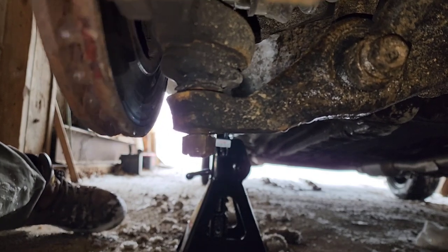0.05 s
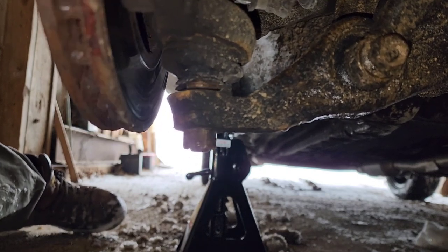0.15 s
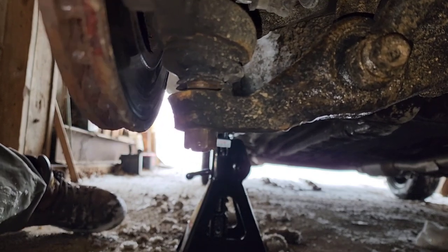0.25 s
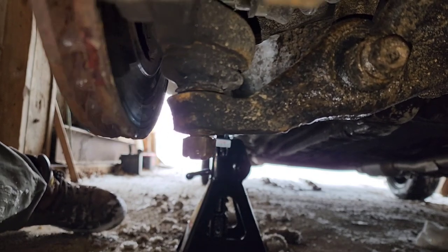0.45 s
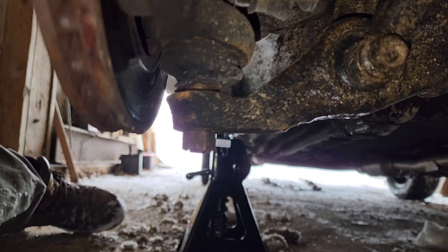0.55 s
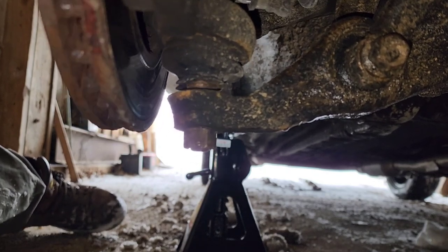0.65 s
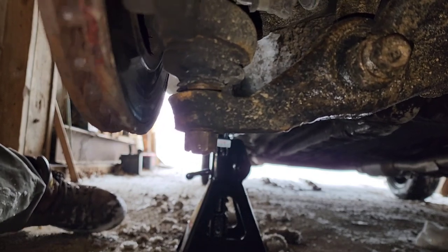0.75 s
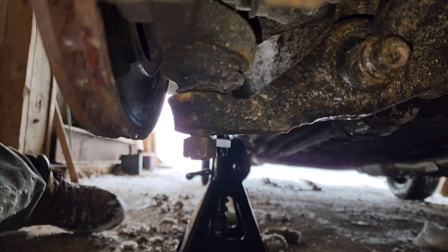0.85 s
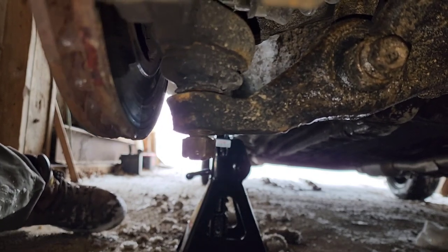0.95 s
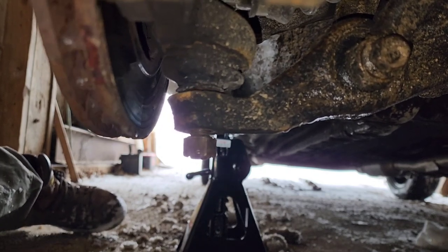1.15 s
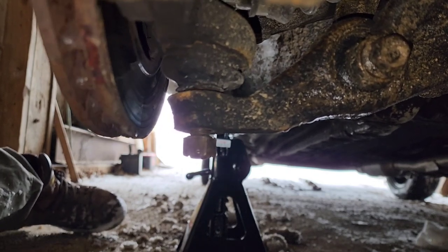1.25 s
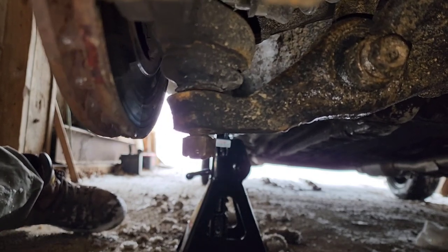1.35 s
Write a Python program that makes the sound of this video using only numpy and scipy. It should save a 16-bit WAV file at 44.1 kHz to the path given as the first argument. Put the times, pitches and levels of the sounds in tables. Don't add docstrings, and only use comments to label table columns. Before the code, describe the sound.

A loose car suspension joint clunks twice, close up. Faint scraping and cloth rustle lead to a heavy, dull metal slam at 0.22 seconds, with rattle and low bouncing thumps until 0.4. Dry ticks and a snap follow near 0.44-0.49, chirps at 0.62, then a second, sharper clunk at 0.68. Small clicks come around 0.9; quiet shed hum remains, with a bright grit tick at 1.13 and a faint tink at 1.34.

```python
import sys
import numpy as np
from scipy import signal
from scipy.fft import rfft, irfft, next_fast_len
from scipy.io import wavfile
from scipy.ndimage import map_coordinates

SR = 44100
rng = np.random.default_rng(int(sys.argv[2]) if len(sys.argv) > 2 else 0)


def convert_level_to_amplitude(level_db):
    exponent = np.asarray(level_db, float) / 20
    return 10 ** exponent


def bounce(signal):
    frames = np.transpose(np.atleast_2d(signal))
    limited = np.clip(frames, -1, 1)
    pcm = np.round(limited * 32767).astype(np.int16)
    wavfile.write(sys.argv[1], SR, pcm)


N = 61739
T = np.arange(N) / SR

# time in seconds, level in dB.
SLIDE = [(0, -47), (.04, -67), (.1, -71.5), (.2, -49), (.29, -48), (.35, -69.5), (.45, -44), (.475, -50.5),
         (.52, -62.5), (.61, -64.5), (.65, -44), (.76, -55), (.82, -71.5), (.895, -46), (.93, -55),
         (1.0, -82), (1.22, -80.5), (1.34, -93)]
# frequency in Hz, level in dB, t60 in seconds.
DISC = [(717, -20, 0.074), (861, -14, 0.094), (965, -15.5, 0.059), (1015, -25, 0.018), (1143, -7, 0.028),
        (1107, -21.5, 0.087), (1300, -62, 0.045), (1500, -39.5, 0.027)]
# frequency in Hz, left minus right in dB.
MODE_PAN = [(150, -1), (240, 1.5), (420, 4), (1200, -5)]


def unit(x):
    return x / np.sqrt(np.mean(x ** 2))


def highpass(x, order, hz):
    return signal.sosfilt(signal.butter(order, hz, "high", fs=SR, output="sos"), x)


def colour(x, points, rings=()):
    size = next_fast_len(N + SR // 4)
    f = np.maximum(np.fft.rfftfreq(size, 1 / SR), 1)
    hz_points, db_points = np.transpose(points)
    db = np.interp(np.log(f), np.log(hz_points), db_points)
    for hz, width, height in rings:
        db = db + height / (1 + (2 * (f - hz) / width) ** 2)
    gain = convert_level_to_amplitude(db)
    gain = gain / np.sqrt(np.mean(gain ** 2))
    return irfft(rfft(x, size) * gain, size)[..., :N]


def pan(x, db):
    return x * convert_level_to_amplitude(np.array([[db / 2], [-db / 2]]))


def pushes(rows):
    out = np.zeros(N)
    for start, db, ms in rows:
        u = (T - start) / (ms / 1000)
        push = np.where((u > 0) & (u < 1), np.sin(np.pi * u), 0)
        out += convert_level_to_amplitude(db) * push * np.pi / 2 / (ms / 1000 * SR)
    return out


def ring(force, modes):
    out = 0
    for hz, db, t60 in modes:
        pole = np.exp(2j * np.pi * hz / SR - np.log(1000) / (t60 * SR))
        mode = convert_level_to_amplitude(db) * signal.lfilter([1], [1, -pole], force).imag
        out = out + pan(mode, np.interp(hz, *np.transpose(MODE_PAN)))
    return out


def decay(start, ms):
    return (T >= start) * np.exp(-np.maximum(T - start, 0) / (ms / 1000))


def bursts(rows, ms, rise_ms):
    return sum(convert_level_to_amplitude(db) * (decay(start, ms) - decay(start, rise_ms)) for start, db in rows)


def curve(rows):
    return convert_level_to_amplitude(np.interp(T, *np.transpose(rows)))


def grains(per_s, spread_db):
    size = convert_level_to_amplitude(spread_db * rng.exponential(size=N)) * rng.standard_normal(N)
    hit = (rng.random(N) < per_s / SR) * size
    return unit(unit(hit) + 0.51 * rng.standard_normal(N))


def air():
    # frequency in Hz, level in dB.
    spectrum = [(15, -45.5), (25, 0.5), (87, 5), (218, -27), (375, -20), (506, -35.5), (4410, -52),
                (14900, -57.5), (16200, -70)]
    # frequency in Hz, width in Hz, height in dB.
    drone = [(119, 12, 8), (177.7, 35, 18.5), (248, 7.4, 8), (293, 12, 14), (353.5, 18.4, 11.5),
             (397.4, 14, 12.5)]
    mid = colour(rng.standard_normal(N), spectrum, drone)
    side = colour(rng.standard_normal(N), spectrum, drone)
    side = signal.lfilter(*signal.butter(1, 400, "high", fs=SR), side)
    return convert_level_to_amplitude(-44.5) * np.array([mid + side, mid - side])


def rustle():
    # time in seconds, level in dB.
    movement = [(0, -59), (.06, -77), (.125, -51), (.15, -62), (.24, -46.5), (.3, -68), (.46, -57.5),
                (.52, -68.5), (.57, -61.5), (.668, -55.5), (.78, -66), (.91, -57), (.97, -78),
                (1.05, -74.5), (1.24, -73), (1.31, -60), (1.36, -65), (1.4, -82)]
    # frequency in Hz, level in dB.
    cloth = [(590, -51), (1000, 2.5), (2290, 1), (5740, -6), (6760, -1.5), (9700, -11), (13100, -1),
             (15100, -3), (16200, -36)]
    return np.array([colour(curve(movement) * grains(4000, 1.9), cloth) for _ in range(2)])


def grit():
    # start in seconds, level in dB.
    skips = [
        (1.1329, -37),
        (1.1334, -31),
        (1.1350, -16),
        (1.1347, -31.5),
        (1.1361, -35),
        (1.1386, -24.5),
        (1.1378, -30),
        (1.1416, -47),
        (1.1422, -45),
        (1.1445, -36),
    ]
    # frequency in Hz, level in dB.
    metal = [(2200, -42), (3400, -29), (5800, -22), (8000, -11.5), (10000, -18), (12600, 5.5),
             (15300, -5.5), (16200, -30)]
    tick_ms, tail_db, tail_t60_s, width = 0.9, -19, 0.055, 0.86
    env = sum(convert_level_to_amplitude(db) * decay(start, tick_ms) for start, db in skips)
    main_s, main_db = skips[2]
    env = env + convert_level_to_amplitude(main_db + tail_db) * decay(main_s, 1000 * tail_t60_s / np.log(1000))
    noise = 0.31 * rng.standard_normal(N) + width * rng.standard_normal((2, N))
    return pan(colour(env * noise, metal), 1)


def tink():
    # frequency in Hz, level in dB, t60 in seconds.
    part = [(770, -12.5, 0.025), (2000, 0, 0.021), (3310, -7, 0.03), (4010, -6.5, 0.074),
            (4180, -20, 0.059), (5470, -12.5, 0.065), (6300, -4.5, 0.016), (357, -16.5, 0.46)]
    start_s, level_db = 1.3394, -44.5
    tap = pushes([(start_s, level_db - 4.5, .08)])
    rasp = convert_level_to_amplitude(level_db - 10.5) * decay(start_s, 1.43) * rng.standard_normal(N)
    return pan(ring(tap + rasp, part), 6)


def low_hum():
    # time in seconds, level in dB.
    hum_level = [(0, -37), (.12, -41.5), (.235, -47), (.275, -20.5), (.36, -29), (.45, -32.5), (.6, -37.5),
                 (.69, -65.5), (.74, -19.5), (.84, -36.5), (.91, -33), (1.05, -43), (1.17, -46), (1.22, -80.5),
                 (1.4, -61)]
    # frequency in Hz, level in dB, t60 in seconds.
    panel = [(389.4, -40.5, 0.092), (227, -40.5, 0.18)]
    pitch_hz, drift_hz = 58, 2.65
    drift = np.interp(T, np.linspace(0, T[-1], num=12), rng.standard_normal(12))
    hum = np.sin(2 * np.pi * np.cumsum(pitch_hz + drift_hz * drift) / SR)
    buzz = ring(curve(hum_level) * rng.standard_normal(N), panel)
    return pan(np.sqrt(2) * curve(hum_level) * hum, MODE_PAN[0][1]) + buzz


def chirps():
    # start in seconds, level in dB.
    rubs = [
        (0.153, -42),
        (0.185, -42),
        (.409, -40.5),
        (0.4268, -34),
        (.591, -63),
        (.851, -42),
        (.618, -30),
        (0.639, -32.5),
        (0.872, -32.5),
    ]
    # frequency in Hz, level in dB, t60 in seconds.
    seat = [(1207, 0, 0.025), (2040, -8, 0.036), (2338, -2, 0.031)]
    rasp = bursts(rubs, 2.1, 0.7) * rng.standard_normal(N)
    return ring(convert_level_to_amplitude(-12.5) * rasp, seat)


def clacks():
    # start in seconds, level in dB.
    snaps = [
        (0.4879, -34),
        (0.9344, -37),
    ]
    # start in seconds, level in dB.
    breaks = [
        (.4428, -38.5),
        (0.49, -40.5),
        (.8872, -40),
        (.8905, -44.5),
        (0.7, -43),
    ]
    # start in seconds, level in dB.
    slaps = [(0.2249, -25.5), (0.2285, -23), (0.2325, -25), (.2435, -35.5), (.266, -35), (.289, -35),
             (0.2932, -32.5), (.690, -29.5), (0.693, -23.5), (.6968, -29.5), (.7045, -39), (.716, -37),
             (.732, -35.5)]
    # frequency in Hz, level in dB, t60 in seconds.
    cup = [(2175, 3.5, 0.025), (2800, 3.5, 0.014), (3097, -1, 0.024), (3640, -13, 0.021),
           (4470, -5.5, .025), (5270, -16, 0.029), (6170, -20, 0.017), (7480, -9.5, .012)]
    neck = [(1950, -7.5, 0.011), (2130, 6.5, .025), (2995, 0.5, 0.032), (3660, -9, 0.031), (3980, -24, .02),
            (4740, -26, 0.014)]
    shield = [(1167, 2, 0.038), (1255, -11, 0.04), (954, -9, 0.031)]
    knock_late_s, knock_db, knock_ms = 0.00406, 3, 0.24
    snap_rasp = convert_level_to_amplitude(-14.5) * bursts(snaps, 1.44, 0.48) * rng.standard_normal(N)
    break_rasp = convert_level_to_amplitude(-14.5) * bursts(breaks, 2.47, 0.48) * rng.standard_normal(N)
    knock = pushes([(start + knock_late_s, db + knock_db, knock_ms) for start, db in snaps])
    slap = pushes([(start, db, .42) for start, db in slaps])
    return ring(snap_rasp, cup) + ring(break_rasp, neck) + ring(knock, DISC) + ring(slap, shield)


def scrape():
    # start in seconds, peak in dB, brightness in dB, treble in dB (both against the peak).
    ticks = [(0.0, -34, -14, -23.5), (0.121, -58, -7, -3), (0.16, -48.5, -23, 3.5),
             (0.176, -32.5, -10.5, -25), (0.186, -45.5, -0.5, -23), (0.198, -40, 3.5, -28),
             (0.214, -19, -12.5, -21.5), (0.233, -18.5, -19.5, -18.5), (0.406, -47.5, -31, -18),
             (0.444, -31.5, -5, -43), (0.489, -41, 1, -36), (0.497, -43, -3, -42), (0.568, -50, -2.5, 2.5),
             (0.619, -38, -28, -48), (0.641, -26.5, -10.5, -38), (0.668, -37, 1.5, -26),
             (0.676, -25, -7, -0.5), (0.678, -24.5, -13.5, -7), (0.683, -25.5, -12, -9),
             (0.696, -25.5, -11.5, -14.5), (0.848, -42.5, -25, -43), (0.888, -33.5, -1, -45),
             (0.934, -36, 1.5, -39), (0.943, -38.5, -20, -35), (1.339, -45.5, -18, -0.5)]
    # frequency in Hz, level in dB.
    body = [(240, -9), (400, 3.5), (540, -0.5), (639, -5.5), (719, 1), (1680, -9), (3010, -19),
            (3340, -19.5), (9000, -48.5), (11700, -71), (19800, -120)]
    # frequency in Hz, width in Hz, height in dB.
    steel = [(1056, 300, 3.5), (2175, 110, 4), (4590, 280, -8)]
    # frequency in Hz, level in dB.
    hiss = [(2650, -60), (4500, -2), (7140, -6), (7980, -4), (9560, -18), (11600, -1), (14900, -15.5),
            (16000, -12.5)]
    width, split_hz = 1.373, 2270
    tick_ms, tick_rise_ms, snap_ms, snap_rise_ms = 4.04, 1, 2.5, .3
    dull_db, bright_db, treble_db = -2.5, 13.5, -3
    start, peak, brightness, treble = np.transpose(ticks)

    def burst(db, ms, rise_ms):
        noise = rng.standard_normal(N) + width * rng.standard_normal((2, N))
        return bursts(zip(start, db), ms, rise_ms) * noise

    def part(x, kind):
        sos = signal.butter(4, split_hz, kind, fs=SR, output="sos")
        return signal.sosfilt(sos, colour(x, body, steel))

    rub = grains(1200, 0.5) + width * rng.standard_normal((2, N))
    slide = colour(curve(SLIDE) * rub, body, steel)
    dull = part(burst(peak + dull_db, tick_ms, tick_rise_ms), "low")
    bright = part(burst(peak + brightness + bright_db, snap_ms, snap_rise_ms), "high")
    top = colour(burst(peak + treble + treble_db, tick_ms, tick_rise_ms), hiss)
    return pan(slide + dull + bright + top, -3.5)


def clunks():
    # start in seconds, level in dB, contact in ms.
    blows = [(.001, -28.5, 1.4), (0.2147, -13, 1.07), (0.2192, 0, 2.26), (0.2269, -16, 1.5),
             (0.285, -13, 2.67), (0.304, -10.5, 2.45), (.443, -26, 1.1), (0.6774, -24, 0.51),
             (0.6814, -2, 1.44), (.690, -16, 1.68), (0.7434, -15.5, 2.3), (0.7648, -12.5, 2.56),
             (.888, -25.5, 0.45), (1.343, -38, 3.6)]
    # start in seconds, level in dB.
    bounces = [(.002, -33), (.14, -30), (.256, -13), (0.284, -7), (.385, -15), (0.459, -21), (0.599, -22),
               (0.718, -21), (0.752, -28), (0.821, -16), (.98, -23.5), (1.077, -26)]
    # frequency in Hz, level in dB, t60 in seconds.
    arm_modes = [(140.46, -6.5, 0.21), (163.8, -10, 0.071), (180, -14.5, 0.084), (233.1, -18, 0.409),
                 (252.8, -17, 0.12), (298.3, -27, 0.24), (370, -27.5, 0.23), (430.6, -25, 0.14)]
    body_modes = [(94.3, 1, 0.35), (120, -23, 0.11)]
    rattle_db, rattle_ms, bounce_ms = -39, 5.3 * 0.83, 15
    force = pushes(blows)
    rattle = sum(convert_level_to_amplitude(db + rattle_db) * decay(start, rattle_ms) for start, db, _ in blows)
    rattle = rattle * grains(600, 4.0)
    judder = convert_level_to_amplitude(-8) * curve(SLIDE) * rng.standard_normal(N)
    arm = highpass(ring(force + judder, arm_modes), 2, 86.5)
    disc = ring(force + rattle + convert_level_to_amplitude(-11.0) * judder, DISC)
    body = ring(pushes([(start, db, bounce_ms) for start, db in bounces]), body_modes)
    return arm + disc + body


def room(x):
    level_db, bass_db, split_hz, lag_ms = -2.5, -9, 440, 1.97
    t60_low_s, t60_high_s = 0.55, 0.079
    t = T[:SR // 2]
    shared = rng.standard_normal(len(t))
    own = rng.standard_normal((2, len(t)))
    low = signal.lfilter(*signal.butter(2, split_hz, fs=SR), shared + 0.095 * own)
    low = low * convert_level_to_amplitude(-60 * t / t60_low_s) / np.sqrt(t60_low_s)
    high = signal.lfilter(*signal.butter(2, split_hz, "high", fs=SR), own)
    high = high * convert_level_to_amplitude(-60 * t / t60_high_s) / np.sqrt(t60_high_s)
    onset = np.clip(t * 1000 / lag_ms - 1, 0, 1)
    tail = (convert_level_to_amplitude(bass_db) * low + high) * onset
    echo = signal.fftconvolve(x.mean(0)[None], tail, axes=1)[:, :N]
    return convert_level_to_amplitude(level_db) * np.sqrt(2 * np.log(1000) / SR) * echo


def scene():
    wet = clunks() + chirps() + scrape() + tink() + clacks()
    near = wet + low_hum()
    lag_ms = .22
    left = map_coordinates(near[0], [np.arange(N) - lag_ms / 1000 * SR], mode="nearest")
    return np.array([left, near[1]]) + room(wet) + rustle() + air() + grit()


def roll_off(x):
    return signal.sosfilt(signal.butter(12, 16490, fs=SR, output="sos"), x)


def record(dry):
    x = highpass(dry, 2, 45.7)
    x = signal.sosfilt(signal.ellip(6, .3, 50, 16000, fs=SR, output="sos"), x)
    return roll_off(x)


dry = scene()
out = record(dry)
bounce(out)
```